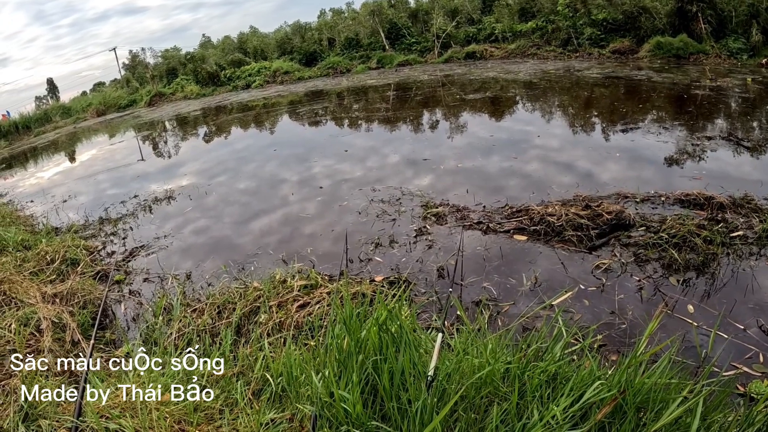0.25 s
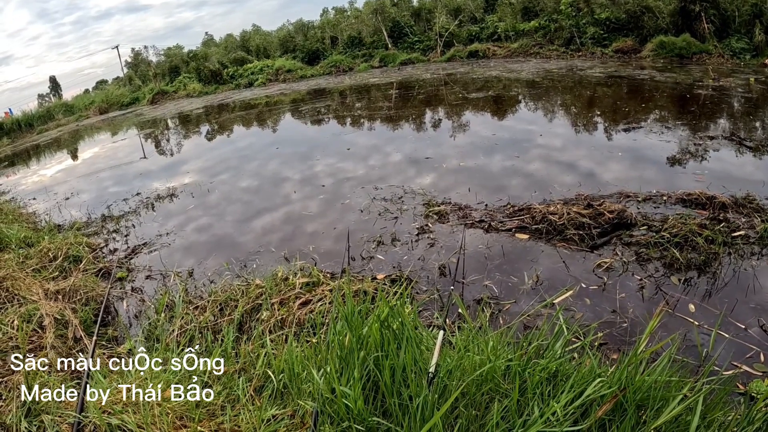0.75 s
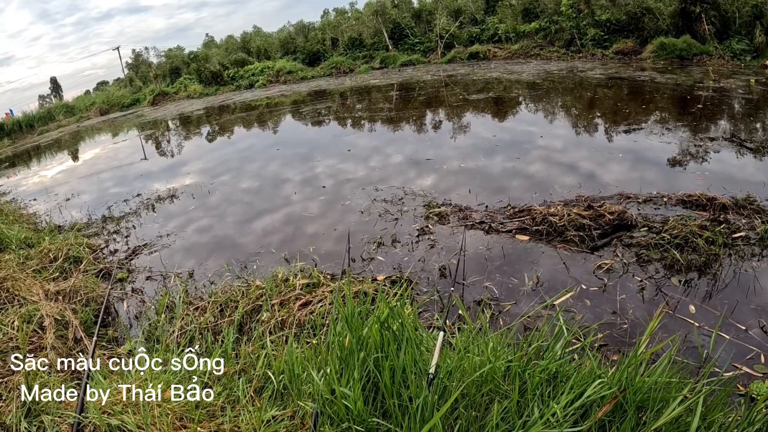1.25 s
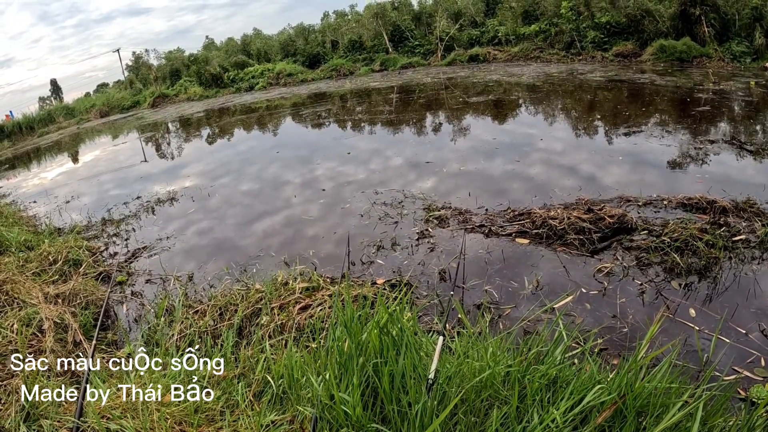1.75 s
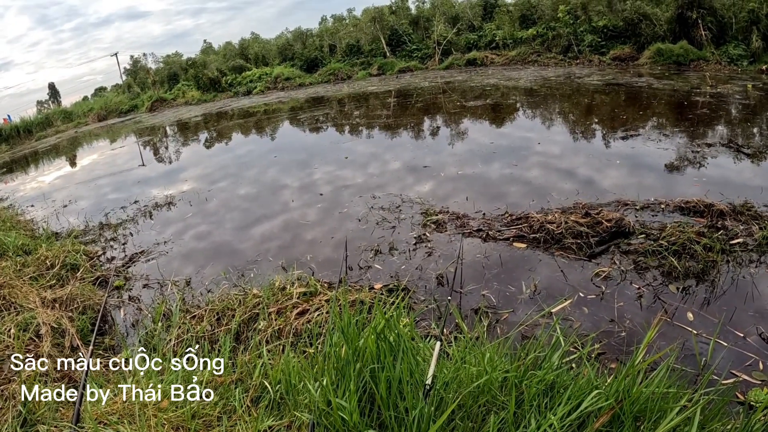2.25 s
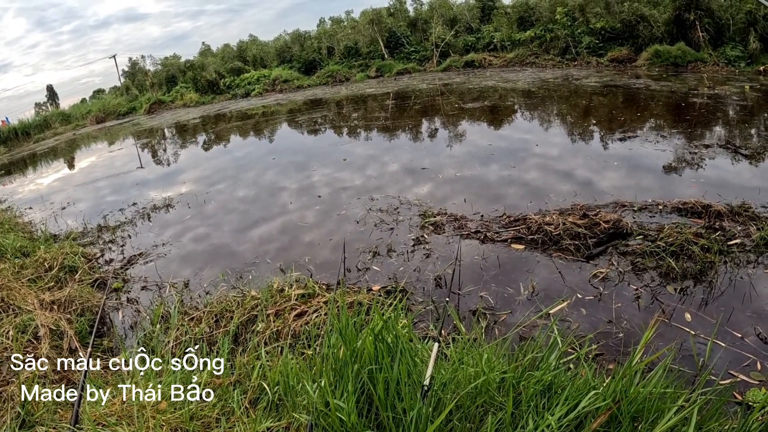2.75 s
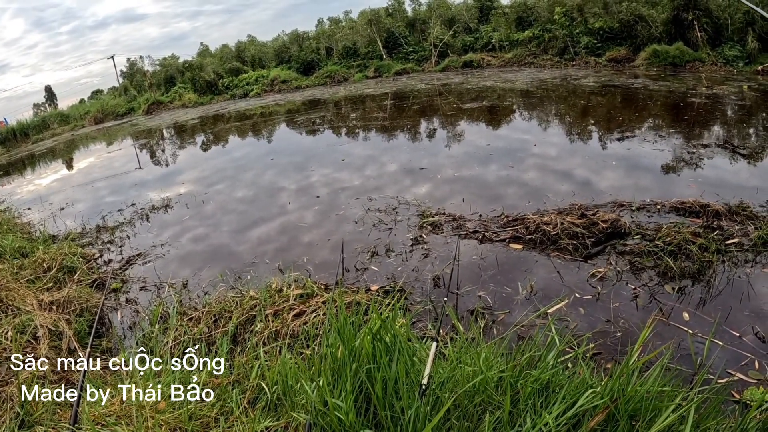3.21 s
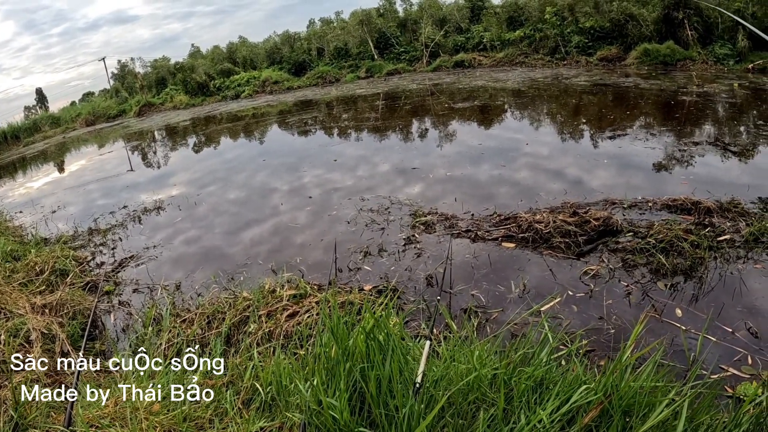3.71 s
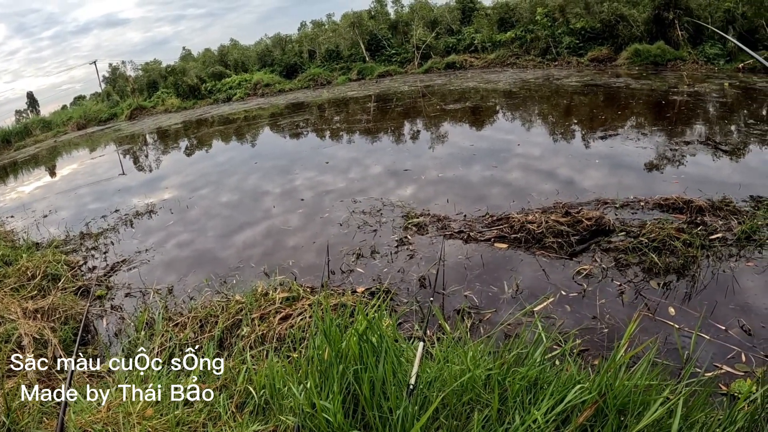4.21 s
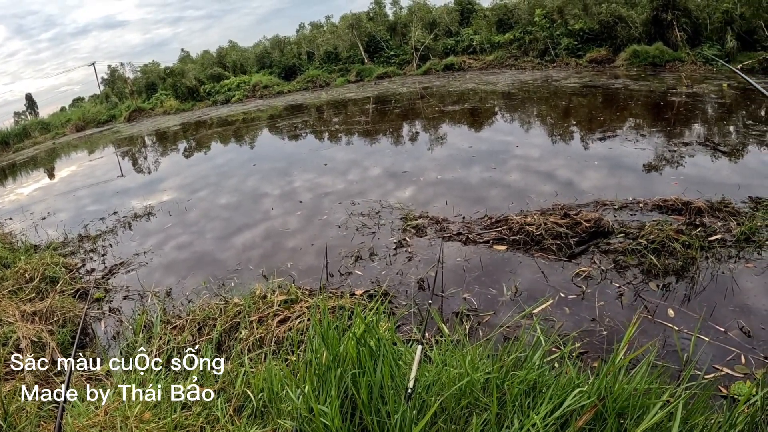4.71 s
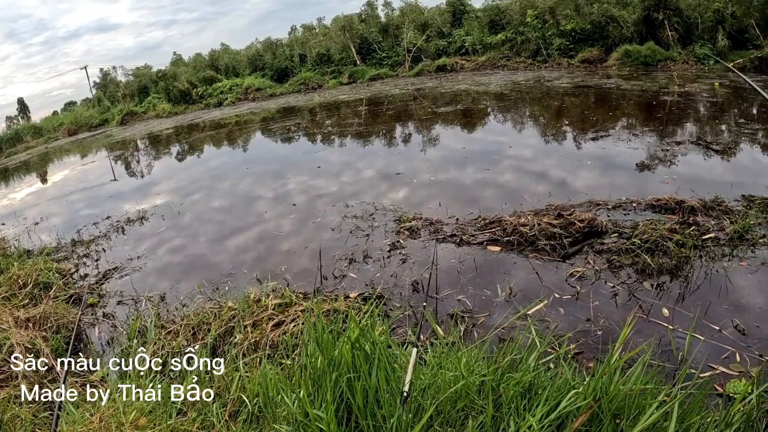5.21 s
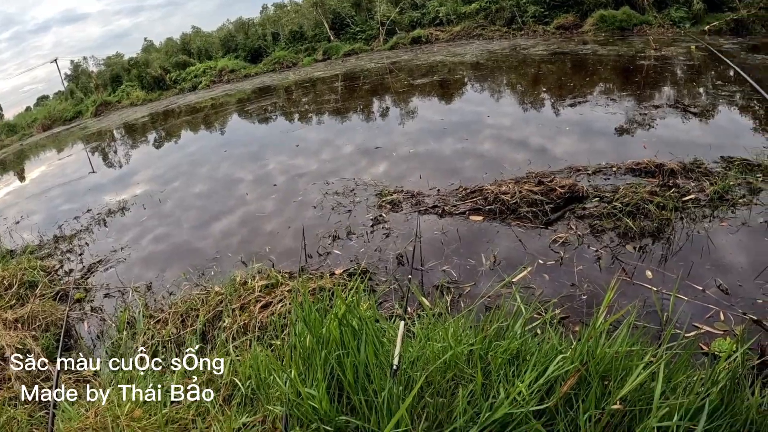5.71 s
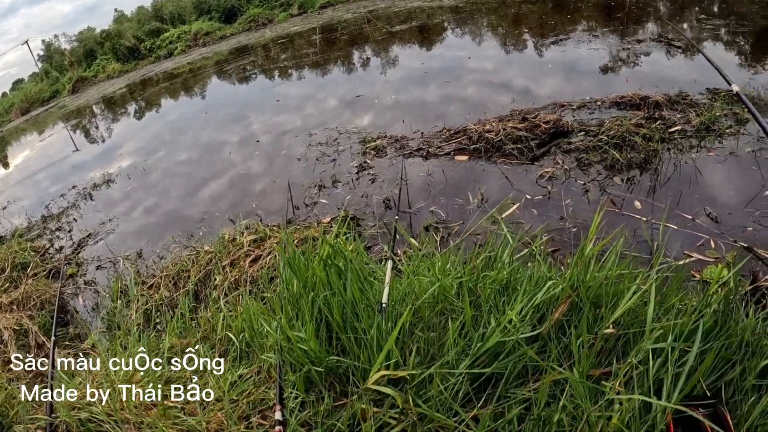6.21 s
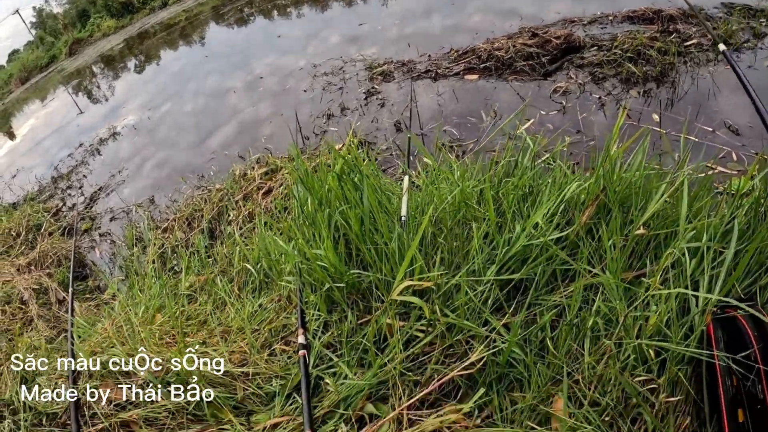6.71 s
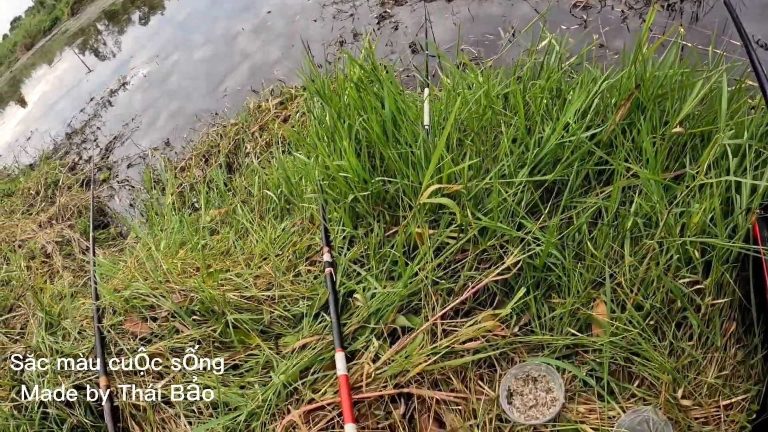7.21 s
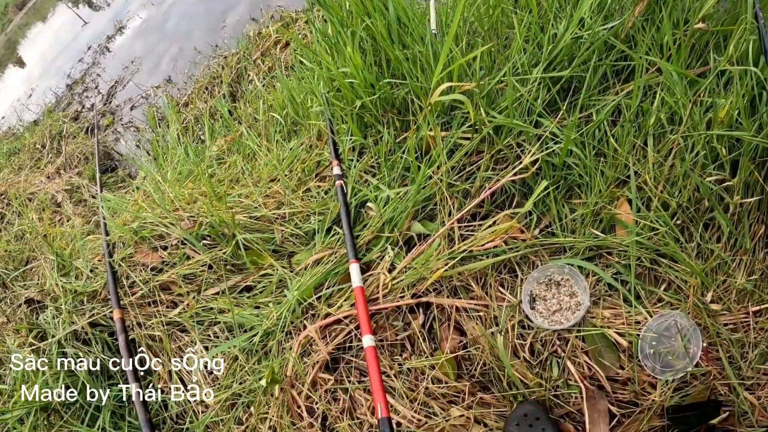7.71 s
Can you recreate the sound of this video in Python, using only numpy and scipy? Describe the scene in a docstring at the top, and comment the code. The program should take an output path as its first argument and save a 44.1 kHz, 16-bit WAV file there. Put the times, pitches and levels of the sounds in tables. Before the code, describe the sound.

Pond bank ambience: shimmering insect trills, echoing bird slurs, a far engine dropping and reviving, one small dry click, faint rustles.

```python
"""Crickets trill on the bank of a swamp pond over a far engine, which drops to idle and picks up again.
Insects are fast-stroked tones and scraped resonances; a far chorus, open air and rumble are shaped noise.
Birds call across the water and one chips nearby: gliding whistles, scattered by the trees.
The engine adds up multiples of its firing rate and throbbing noise; far tones waver in pitch.
On the bank, fading modes make one sharp click, noise makes faint rustles and rising tones make blips."""
import sys
import numpy as np
from scipy import signal
from scipy.fft import rfft, irfft, next_fast_len
from scipy.io import wavfile

SR = 44100
rng = np.random.default_rng(int(sys.argv[2]) if len(sys.argv) > 2 else 0)


def wrap_up_sound(samples):
    """Save the sound to the file named by the first command line argument, as 16-bit audio."""
    columns = np.atleast_2d(samples).T
    # keep every value between -1 and 1, then stretch to whole-number steps
    tamed = np.clip(columns, -1, 1)
    steps = np.round(tamed * 32767).astype(np.int16)
    wavfile.write(sys.argv[1], SR, steps)


N = 350595
T = np.arange(N) / SR  # time of every sample [s]


def gain_of(db):
    """Turns decibels into an amplitude factor."""
    return 10 ** (np.asarray(db) / 20)


def evened(x):
    """Scales a sound to an average strength (rms) of 1."""
    return x / np.sqrt(np.mean(x ** 2) + 1e-20)


def curve(rows):
    """Joins (time, value) rows by straight lines, giving a value for every sample."""
    times, values = np.transpose(rows)
    return np.interp(T, times, values)


def read(points, hz):
    """Reads (frequency, value) points at any frequency, on a logarithmic frequency axis."""
    f, value = np.transpose(points)
    return np.interp(np.log(hz + 1), np.log(f + 1), value)


def swept(hz):
    """A sine whose pitch follows hz: adding up the frequency gives the phase."""
    return np.sin(2 * np.pi * np.cumsum(hz) / SR)


def placed(x, pan_db):
    """Sets a sound between the ears by a level difference; positive is to the left."""
    return x * gain_of([[pan_db / 2], [-pan_db / 2]])


def drift(per_s):
    """Smooth random motion of rms 1; a larger per_s [Hz] makes it quicker."""
    size = next_fast_len(N)
    hz = np.fft.rfftfreq(size, 1 / SR)[:size // 32]  # only slow motion is needed
    z = rng.standard_normal((len(hz), 2)) @ [1, 1j]
    slow = z * np.exp(-(hz / per_s) ** 2) * (hz > 0)
    return evened(irfft(slow, size)[:N])


def noise(spectrum):
    """Filtered stereo noise of rms 1: nearly mono in the bass, separate at each ear in the treble."""
    # how alike left and right are: (frequency [Hz], likeness [0-1])
    likeness = [(30, 0.98), (80, 1), (150, 0.48), (250, 0.46), (500, 0.26), (1000, 0.01), (14000, 0)]
    hz = np.fft.rfftfreq(N, 1 / SR)
    a, b = rfft(rng.standard_normal((2, N)))
    same = np.clip(read(likeness, hz), -1, 1)
    z = np.array([a, same * a + np.sqrt(1 - same ** 2) * b])
    return evened(irfft(z * gain_of(read(spectrum, hz)), N))


def forest(x, wet, t60, pan_db, build=0.0068):
    """Direct sound plus dense scatter from trunks and leaves, different at each ear.

    wet: scattered share of the power [0-1]; t60: time to fade by 60 dB [s]; build: rise time [s]."""
    t = np.arange(SR // 2) / SR
    wet = np.clip(wet, 0, 1)
    tail = rng.standard_normal((2, len(t))) * gain_of(-60 * t / t60) * (1 - np.exp(-t / build))
    tail *= np.sqrt(wet) / np.linalg.norm(tail, axis=1, keepdims=True)
    tail[:, 0] = np.sqrt(1 - wet)  # the direct sound
    return placed(signal.oaconvolve(x[None], tail, axes=1)[:, :N], pan_db)


def calls(times, levels_db, shape, vary, flutter, hoarse, wet, t60, pan_db, pitch=1, build=0.0088):
    """Whistled notes of one shape, with an optional hoarse edge; each scatters its own way."""
    highest_note_hz = 4646  # the pitch tops out here
    hoarse_spectrum = [(1700, -12.0), (2400, -2.5), (3400, 3.5), (4200, 3.0), (7000, 0.5),
                       (8500, -20.0), (13000, -19.0)]  # (frequency [Hz], relative level [dB])
    out = np.zeros((2, N))
    waver = 1 + flutter * drift(390)
    hiss = hoarse * noise(hoarse_spectrum)[0]
    at, hz, size = np.transpose(shape)
    chances = rng.standard_normal(len(times))  # a random shift of pitch for each note
    for s, db, scatter, scale, chance in np.broadcast(times, levels_db, wet, pitch, chances):
        on = np.flatnonzero((T > s + at[0]) & (T < s + at[-1]))
        age = T[on] - s
        glide = np.interp(age, at, hz) * scale * (1 + vary * chance) * waver[on]
        whistle = swept(np.minimum(glide, highest_note_hz))
        note = np.interp(age, at, size) * (whistle + hiss[on])
        start = on[0]
        heard = gain_of(db) * forest(note, scatter, t60, pan_db, build)[:, :N - start]
        out[:, start:start + heard.shape[1]] += heard
    return out


def background(rumble_db=-0.1, lumps_db=1.8, air_swell_db=1.5):
    """Noise shaped into low rumble, open air and the blur of countless far insects, plus a faint hum."""
    # noise colours: (frequency [Hz], relative level [dB])
    rumble_spectrum = [(12, -40), (25, 1), (42, -0.5), (75, -0.5), (110, -7.5), (170, -20.5), (260, -25),
                       (450, -41.5), (900, -71.5)]
    air_spectrum = [(100, -37), (300, 8), (500, 3), (800, -1.5), (1200, 5.5), (2100, 0.5), (3000, -1),
                    (4000, -3), (5000, 2), (7000, 1.5), (8500, -8), (11000, -12), (12500, -11),
                    (14000, -24)]
    chorus_spectrum = [(4700, -43), (5200, -12.5), (5500, 2.5), (5750, 0), (5900, 9), (6050, -1),
                       (6270, 5.5), (6370, -11), (6850, -4.5), (7150, -21.5), (8200, -42)]
    # the rumble swells and sinks; rumble_db is added: (time [s], level [dB])
    rumble_level = [(0, -40), (.65, -49), (.9, -40), (1.12, -45.5), (1.5, -43), (2.1, -43), (2.35, -47),
                    (2.8, -42.5), (3.1, -45.5), (4.1, -44), (4.4, -41.5), (4.6, -46), (5.55, -41.5),
                    (6.2, -44), (6.75, -44), (7.3, -41.5), (7.7, -37), (7.95, -45)]
    # middle level of the open air: (time [s], level [dB])
    air_level = [(0, -63), (1.4, -64), (2.6, -66), (3.8, -66), (4.45, -66), (5.1, -64), (6, -64.5),
                 (7.95, -64.5)]
    # steady far hum: (middle pitch [Hz], level [dB])
    hum_tones = [(274, -74), (695, -93)]

    rumble = noise(rumble_spectrum) * gain_of(curve(rumble_level) + rumble_db + lumps_db * drift(1.9))
    air = placed(noise(air_spectrum), 1.0) * gain_of(curve(air_level) + air_swell_db * drift(11.5))
    chorus_db = -58.5 + 0.6 * drift(6.8) + 0.7 * drift(28)  # slow swell and faster flicker
    chorus = noise(chorus_spectrum) * gain_of(chorus_db)
    hum = sum(gain_of(db) * evened(swept(hz + 1.85 * drift(6.9))) for hz, db in hum_tones)
    return rumble + air + chorus + hum


def far_tones(wet=0.41, t60=0.14):
    """Thin far-off whistles and hoots: sines of wavering pitch that swell and fade."""
    # (middle time [s], length [s], level before the fade [dB], pitch [Hz], waver [Hz])
    tone_rows = [(0.364, 0.067, -62, 2710, 10), (3.35, 0.06, -69, 697, 55), (3.884, 0.11, -68, 490, 62),
                 (4.09, 0.058, -64, 696, 49), (4.433, 0.072, -66.5, 710, 65.4),
                 (4.54, 0.57, -75.5, 1614, 28)]
    out = np.zeros((2, N))
    for s, length, db, hz, waver_hz in tone_rows:
        tone = evened(swept(hz + waver_hz * drift(45.0)))
        swell = np.exp(-(2 * (T - s) / length) ** 4)
        out += forest(tone * gain_of(db) * swell, wet, t60, 3.0)
    return out


def click():
    """A sharp, dry click: a few modes start together and each rings down at its own rate."""
    # (start time [s], level added to every mode [dB])
    start_s, level_db = (1.7333, -41)
    # (frequency [Hz], time to fade by 60 dB [s], relative level [dB])
    modes = [(1800, 0.02, -17), (3960, 0.0037, -11), (5600, 0.0041, 2), (9510, 0.00091, -25)]
    t = np.maximum(T - start_s, 0)
    ringing = 0
    for hz, t60, db in modes:
        fade = gain_of(db - 60 * np.minimum(t / t60, 4))
        ringing = ringing + fade * np.sin(2 * np.pi * hz * t)
    return placed(gain_of(level_db) * ringing, 1.43)


def rustles():
    """Faint rustles and soft bands of noise: grainy noise that swells and fades."""
    # (middle time [s], length [s], level before the fade [dB], centre [Hz], width [octaves])
    rustle_rows = [(1.298, 0.074, -57.5, 390, 0.64), (1.357, 0.1, -74, 1090, 0.64),
                   (1.737, 0.014, -64, 3200, 1), (1.75, 0.059, -55, 267, 0.34),
                   (3.33, 0.18, -67.5, 700, 0.85), (3.872, 0.47, -71, 487, 0.27),
                   (4.35, 0.83, -71.5, 1270, 0.37), (4.364, 0.74, -71.5, 716, 0.18),
                   (4.747, 0.023, -59, 1260, 0.47), (7.202, 0.09, -69, 740, 0.41),
                   (7.3, 1, -72.5, 430, 0.24), (7.6, 0.16, -68, 6000, 0.99), (7.933, 0.15, -55, 4570, 4.4)]
    out = np.zeros((2, N))
    hz = np.fft.rfftfreq(N, 1 / SR)
    grains = rfft(rng.standard_normal((2, N)) * gain_of(3.6 * drift(100)))
    for s, length, db, centre, octaves in rustle_rows:
        band = np.exp(-(np.log2((hz + 1) / centre) / octaves) ** 2)
        rustle = evened(irfft(grains * band, N))
        out += gain_of(db) * rustle * np.exp(-(2 * (T - s) / length) ** 2)
    return out


def blips():
    """Short tones that rise in pitch, like bubbles at the water's edge."""
    # (time [s], level [dB], base pitch [Hz])
    blip_rows = [(1.216, -60, 1200), (1.312, -62, 754), (1.32, -61, 1020), (1.327, -62, 1340),
                 (1.349, -58, 963), (1.374, -62, 1360), (1.38, -63, 1764), (1.738, -56.5, 1150)]
    # (time from the blip's own time [s], pitch [factor], amplitude [0-1])
    blip_shape = [(-.012, 0.87, 0.1), (0, 1, 0.86), (.008, 1.06, .6), (.022, 1.18, 0)]
    s, db, hz = np.transpose(blip_rows)
    return calls(s, db, blip_shape, vary=0.0045, flutter=.03, hoarse=0, wet=0.28, t60=0.11,
                 pan_db=1.2, pitch=hz)


def rasp(hz, width_hz, strokes, depth):
    """A wing resonance scraped in very fast strokes: narrow noise pulsing in level."""
    f = np.fft.rfftfreq(N, 1 / SR)
    resonance = 1 / (1 + ((f - hz) / (width_hz / 2)) ** 4)
    ring = irfft(rfft(rng.standard_normal((2, N))) * resonance, N)
    pulse = swept(strokes * (1 + 0.0248 * drift(1.8)))  # strokes per second, unsteady
    return evened(ring * (1 + depth * pulse))


def buzzers(phrase_db=-78, rise=0.16, fall=0.018):
    """One insect buzzes on while swelling and fading; a higher one repeats a phrase at a steady pace."""
    # the low buzzer: (time [s], level [dB])
    buzz_level = [(0, -84), (1.4, -71), (2, -73.5), (2.3, -89), (3.5, -81), (3.9, -72.5), (4.7, -73),
                  (5.2, -77), (6, -90), (7, -69), (7.58, -71), (7.7, -82.5)]
    first_s, every_s, length_s = -0.0088, .932, 0.593  # timing of the phrases
    low, high = rasp(7400, 330, 78, .45), rasp(9920, 520, 123, .6)
    age = (T - first_s) % every_s
    gate = np.clip(np.minimum(age / rise, (length_s - age) / fall), 0, 1)  # rise and fall in seconds
    low_buzz = placed(low * gain_of(curve(buzz_level)), 4.3)
    return low_buzz + placed(high * gate * gain_of(phrase_db), 1.7)


def clatter(turns, level_db=-2, throb=0.35):
    """The engine's rough mechanical noise, which throbs with each firing."""
    # level_db is added: (time [s], level [dB])
    clatter_level = [(0, -62.5), (.6, -59), (1.3, -58), (1.65, -69), (2, -63), (2.3, -65), (2.42, -61),
                     (2.8, -60.5), (3, -74), (3.35, -64), (3.6, -67), (4.2, -66.5), (4.8, -56.5),
                     (5.5, -63), (6.85, -58), (7.02, -56.5), (7.55, -58), (7.75, -72), (7.95, -59)]
    # (frequency [Hz], relative level [dB])
    body = noise([(120, -28), (220, 5.0), (290, 5.5), (420, -5.0), (600, -26.0), (1200, -48)])
    throbbing = evened(body * (1 + throb * np.cos(2 * np.pi * turns)))
    return throbbing * gain_of(curve(clatter_level) + level_db)


def engine(waver_db=2.0, idle_rough=0.039, smear=1.0, level_db=-2.0, fourth_db=4.0, flutter_db=1.23):
    """Multiples (orders) of the firing rate through the exhaust: bright under load, dull thumps at idle."""
    # exhaust as heard from afar: (frequency [Hz], relative level [dB])
    exhaust = [(26, -33), (55, -4), (75, -6), (92, -4.5), (103, 1.5), (124, 3.5), (153, -2), (182, -6),
               (208, -8), (235, -27), (300, -24.5), (420, -48)]
    # the engine pulls, idles, picks up and runs down: (time [s], firing rate [per s])
    engine_speed = [(0, 29.7), (.3, 30.5), (.6, 30.5), (.75, 30.9), (.93, 30.7), (1.324, 28.6),
                    (1.454, 27.3), (1.55, 24.5), (1.8, 13), (3.95, 13.5), (4.25, 19.5), (4.48, 22.1),
                    (4.78, 24.7), (5.4, 24.9), (6.6, 26.3), (7.02, 25.6), (7.26, 25.8), (7.64, 23.5),
                    (7.95, 16)]
    # middle loudness; level_db is added: (time [s], level [dB])
    engine_level = [(0, -38.5), (.3, -42.5), (.5, -37.5), (.7, -40.5), (.95, -38.5), (1.33, -41.5),
                    (1.52, -39.5), (1.8, -51.5), (2.3, -54.5), (2.5, -47), (2.8, -47.5), (3.3, -43.5),
                    (3.65, -49.5), (4.05, -50), (4.35, -43.5), (4.8, -43), (5.3, -44), (5.7, -40.5),
                    (6.5, -39), (7.25, -40), (7.6, -38.5), (7.8, -52), (7.95, -46.5)]
    idle_tilt_db, pickup_tilt_db = -7, 7  # change of treble per octave, from 100 to 220 Hz
    pickup_s, pickup_length_s = 5.15, 1.56  # middle and length of the brighter stretch

    rate = curve(engine_speed)
    slack = np.clip((24 - rate) / 10, 0, 1)  # 0 under load, 1 at idle
    pickup = np.exp(-(2 * (T - pickup_s) / pickup_length_s) ** 4)
    bright_db = idle_tilt_db * slack + pickup_tilt_db * pickup
    turns = np.cumsum(rate) / SR + (0.0062 + idle_rough * slack) * drift(4.27)  # firings so far
    out, power = np.zeros(N), 0
    for order in range(1, 22):
        hz = order * rate
        octaves_up = np.log2(np.clip(hz, 100, 220) / 100)
        size = gain_of(read(exhaust, hz) + fourth_db * (order == 4) + bright_db * octaves_up)
        # the phase of each order wanders slowly, softening the thumps
        phase_wander = smear * drift(0.55)
        out += size * gain_of(waver_db * drift(6.9)) * np.cos(2 * np.pi * order * turns + phase_wander)
        power += size ** 2 / 2
    loudness = gain_of(curve(engine_level) + level_db + flutter_db * drift(14.7))
    return placed(out / np.sqrt(power) * loudness, 1.) + clatter(turns)


def birds(slur_db=6.0, arch_db=4, top_db=4.0, chip_db=-5.0, peep_db=-1.5):
    """Gliding whistles: far birds arrive mostly as scatter from the trees, near ones stay crisper."""
    # falling slurs; slur_db is added: (time [s], level [dB], scattered share [0-1], base pitch [Hz])
    slur_rows = [(0.028, -58, 0.56, 3020), (0.297, -61.5, 0.73, 3120), (0.5535, -64.5, 0.86, 3044),
                 (0.813, -62.5, 0.79, 3130), (1.0988, -60.5, 0.92, 2953), (1.3734, -61.5, 0.65, 3075),
                 (1.816, -65.5, 0.9, 2890), (2.075, -60.5, 0.8, 2874), (2.329, -62, 0.7, 2870),
                 (2.5682, -62, 0.95, 2920), (2.7866, -59, 0.87, 2900), (3.076, -63, 0.94, 2920),
                 (3.3348, -59, 0.84, 2920), (3.6032, -62.5, 0.92, 2880), (3.86, -62, 0.92, 2920),
                 (4.15, -61.5, 0.76, 2925), (4.447, -60.5, 0.78, 2904), (4.805, -63.5, 0.64, 2907),
                 (5.076, -61, 0.8, 2850), (5.344, -63, .95, 2930), (5.6145, -62.5, 0.8, 2945),
                 (5.714, -66.5, 0.8, 2845), (5.875, -63, 0.9, 2905), (6.1532, -62.5, 0.89, 2890),
                 (6.448, -63.5, 0.8, 2880), (6.599, -63.5, 0.74, 2810), (6.724, -62, 0.77, 2920),
                 (6.98, -60.5, 0.72, 2900), (7.2455, -62.5, 1, 2800), (7.525, -61, 0.57, 2840),
                 (7.8049, -59, 0.85, 2840)]
    # held notes: (time [s], level [dB], base pitch [Hz])
    held_rows = [(.34, -61, 2720), (.575, -56.5, 2730), (.88, -73, 2700), (1.43, -70, 2700),
                 (6.755, -59, 2900), (7.585, -63, 2830)]
    # rasping arched calls; arch_db or top_db is added: (time of the top [s], level [dB])
    arch_rows = [(0.498, -57.5), (1.038, -58), (2.0149, -58), (2.7164, -57.5), (3.3564, -59),
                 (4.487, -59.5), (5.035, -57), (5.655, -59), (6.562, -56), (7.201, -57), (7.7993, -57.5)]
    # quick near chips; chip_db is added: (time [s], level [dB], scattered share [0-1], base pitch [Hz])
    chip_rows = [(4.395, -55, 0.8, 4230), (4.429, -51, 0.9, 4270), (4.466, -45, 0.8, 4390),
                 (4.503, -42, 0.7, 4310), (4.5442, -43, 0.45, 4320), (4.694, -49.5, 0.7, 4320),
                 (4.734, -45.5, 0.2, 4200), (4.771, -43.5, 0.2, 4300), (4.922, -47, 0.1, 4250),
                 (4.9581, -44.5, 0.2, 4290), (4.993, -45.5, 0.3, 4270), (5.14, -43, 1, 4290),
                 (5.176, -43.5, 0.5, 4310), (5.216, -42, 0.18, 4250)]
    # short fluttering peeps; peep_db is added: (time [s], level [dB], base pitch [Hz])
    peep_rows = [(0.148, -56, 2360), (0.174, -49.5, 2340), (0.199, -45.5, 2764), (0.237, -48, 2570),
                 (.268, -45.5, 2747), (3.815, -50.5, 2917), (4.076, -59, 2750)]
    # note shapes: (time from the note's own time [s], pitch [factor], amplitude [0-1])
    slur_shape = [(-.012, 1.14, 0.1), (-.002, 1.05, .8), (0.024, .97, 1), (.045, .88, 0.55),
                  (.075, .77, 0.2)]
    held_shape = [(0, 1.01, 0), (.012, 1, 1), (.05, .99, 0)]
    chip_shape = [(-.016, 1.05, 0), (-.007, 1.045, 0.3), (.002, 1, 1), (.009, .95, .7),
                  (0.014, 0.908, 0.12)]
    peep_shape = [(-.018, .95, 0), (-.01, 1.03, 0.4), (-.005, .98, .3), (0, 1.01, 1), (.005, .97, 0.15),
                  (.009, 1, 0.7), (0.016, 0.9, 0)]
    # arched call and its whistled top: (time from the top [s], pitch [Hz], amplitude [0-1])
    arch_shape = [(-.062, 2850, 0.3), (-.042, 3450, .8), (-.022, 4150, 1), (-.01, 4520, .9),
                  (.005, 4500, .6), (.022, 3950, 0.6), (.045, 3400, .6), (.068, 3000, 0.6)]
    top_shape = [(-.016, 4426, 0.9), (0, 4426, 0.97), (.03, 4480, 0)]

    s, db, scatter, hz = np.transpose(slur_rows)
    slurs = calls(s, db + slur_db, slur_shape, vary=0.004, flutter=0.032, hoarse=0.5, wet=scatter,
                  t60=0.44, pan_db=6.0, pitch=hz, build=0.012)
    s, db, hz = np.transpose(held_rows)
    held = calls(s, db, held_shape, vary=0.0046, flutter=0.014, hoarse=0, wet=0.52,
                 t60=0.16, pan_db=10, pitch=hz)
    s, db = np.transpose(arch_rows)
    arches = calls(s, db + arch_db, arch_shape, vary=0.0041, flutter=0.071, hoarse=0.31, wet=0.97,
                   t60=0.43, pan_db=3.5)
    tops = calls(s, db + top_db, top_shape, vary=0.0055, flutter=0.021, hoarse=0, wet=0.8,
                 t60=0.82, pan_db=-1)
    s, db, scatter, hz = np.transpose(chip_rows)
    chips = calls(s, db + chip_db, chip_shape, vary=0.002, flutter=0.0041, hoarse=0.032, wet=scatter,
                  t60=0.11, pan_db=7.0, pitch=hz)
    s, db, hz = np.transpose(peep_rows)
    peeps = calls(s, db + peep_db, peep_shape, vary=0.003, flutter=0.045, hoarse=0.08, wet=0.49,
                  t60=0.19, pan_db=9.0, pitch=hz)
    return slurs + held + arches + tops + chips + peeps


def crickets(duty=.52, wet=0.59, level_db=3.0, wander_hz=11):
    """Each wing stroke is a short tone that sags in pitch; the trills drift in and out of step."""
    # (pitch [Hz], fall per stroke [Hz], strokes [per s], relative level [dB], left over right [dB])
    cricket_rows = [(6169, 130, 36.3, -59.5, -3.5), (6210, 170, 33.5, -67.5, 5),
                    (6130, 240, 30.5, -70, -10.5), (6240, 140, 39, -70, 4.5), (5630, 330, 25, -73.5, -5),
                    (5540, 260, 34, -69.5, 8.5)]
    # level of all trills together; level_db is added: (time [s], level [dB])
    trill_level = [(0, -58.5), (.4, -64.5), (1.3, -57), (1.6, -60.5), (2.5, -64), (3.1, -61), (4.1, -59.5),
                   (4.6, -62), (5, -59.5), (5.65, -57.5), (5.95, -63), (6.62, -58), (6.88, -60.5),
                   (7.45, -62.5), (7.95, -60)]
    # brief surges of the nearest cricket, the first row: (middle time [s], added level [dB])
    surges = [(.09, 3.5), (.62, 10.5), (1.25, 2.4), (2.3, 2.8), (2.76, 9.8), (4.77, 5), (4.97, 5.6),
              (5.27, 2.5), (6.33, 5), (6.64, 4.2), (7.6, 3), (7.82, 2.2)]
    surge_length_s = .11
    out = np.zeros((2, N))
    surge_db = sum(db * np.exp(-(2 * (T - s) / surge_length_s) ** 2) for s, db in surges)
    for k, (hz, fall_hz, strokes, db, pan_db) in enumerate(cricket_rows):
        cycle = np.cumsum(strokes * (1 + 0.0246 * drift(2.5))) / SR % 1
        stroke = np.minimum(cycle / duty, 1)  # the rest of each cycle is silent
        pitch = hz + fall_hz * (.5 - stroke) + wander_hz * drift(40.8)
        effort = gain_of(1.1 * drift(3.5) + surge_db * (k == 0))
        song = evened(np.sin(np.pi * stroke) * swept(pitch) * effort)
        out += gain_of(db) * forest(song, wet, 0.093, pan_db)
    return evened(out) * gain_of(curve(trill_level) + level_db)


def scene():
    """Everything heard from the bank."""
    on_the_bank = click() + rustles() + blips()
    return background() + far_tones() + on_the_bank + buzzers() + engine() + birds() + crickets()


def record(dry):
    """Takes away the highest treble with a steep low-pass filter."""
    edge_hz = 14200
    low_pass = signal.firwin(511, edge_hz, window=("kaiser", 9), fs=SR)
    return signal.oaconvolve(dry, low_pass[None], "same")


dry = scene()
out = record(dry)
wrap_up_sound(out)
```